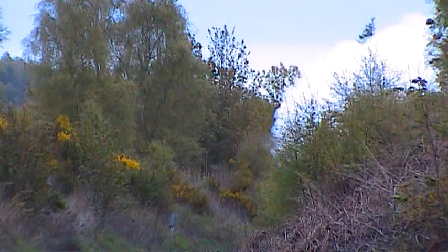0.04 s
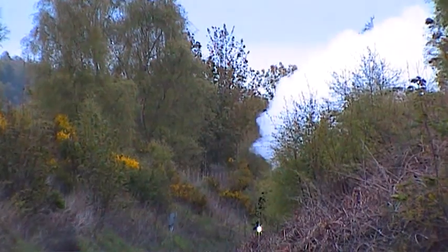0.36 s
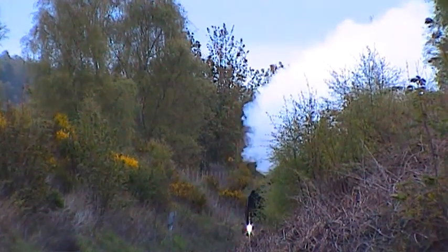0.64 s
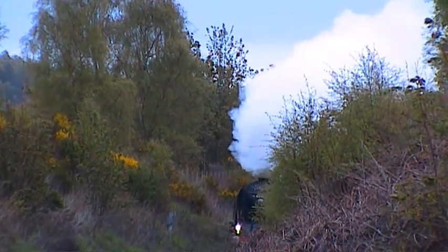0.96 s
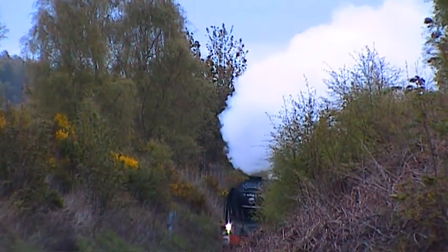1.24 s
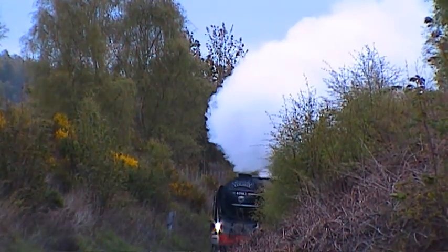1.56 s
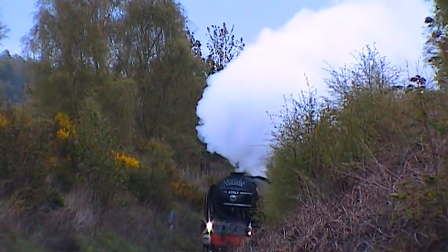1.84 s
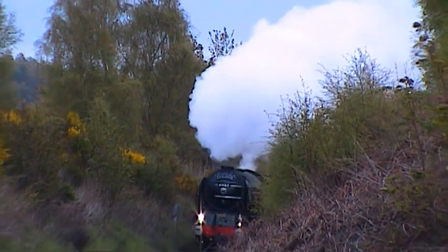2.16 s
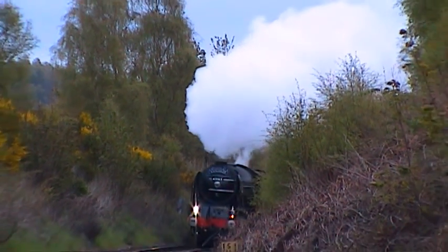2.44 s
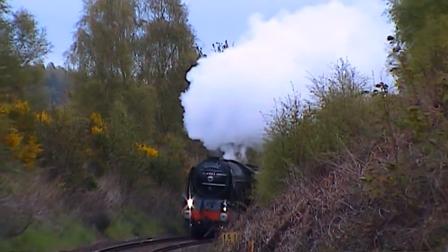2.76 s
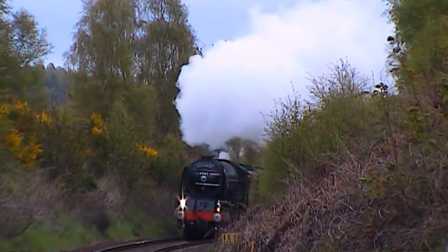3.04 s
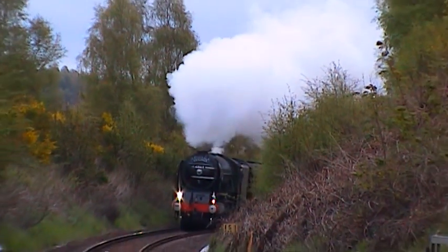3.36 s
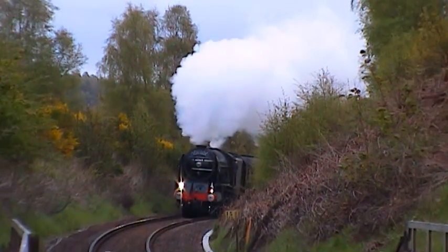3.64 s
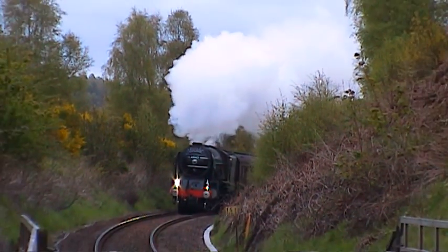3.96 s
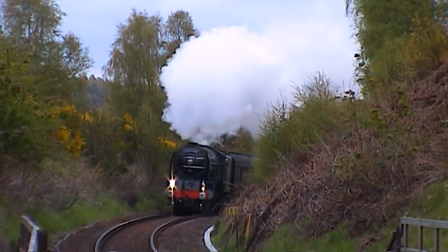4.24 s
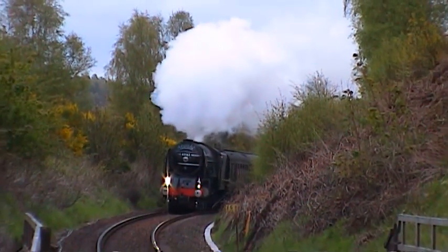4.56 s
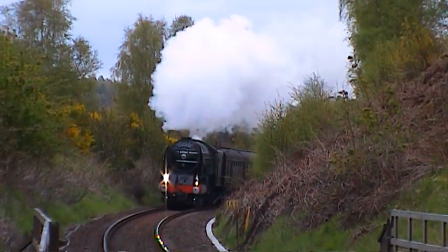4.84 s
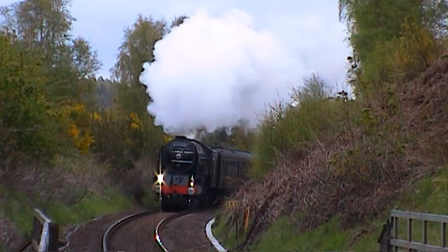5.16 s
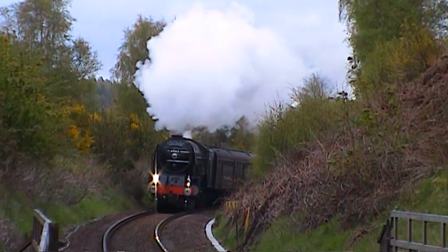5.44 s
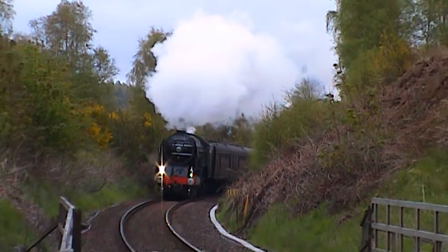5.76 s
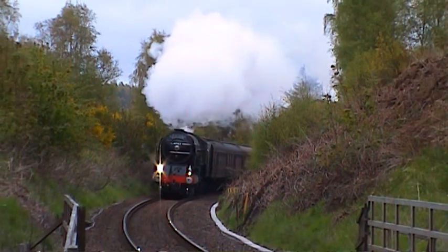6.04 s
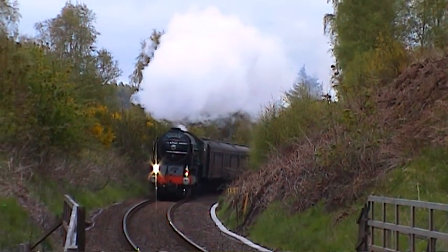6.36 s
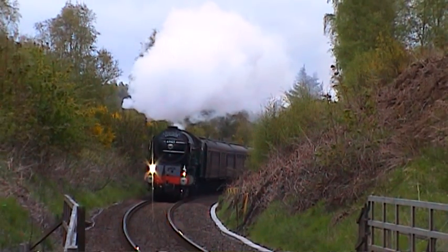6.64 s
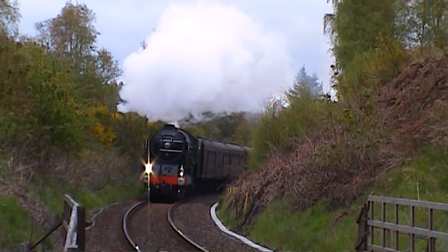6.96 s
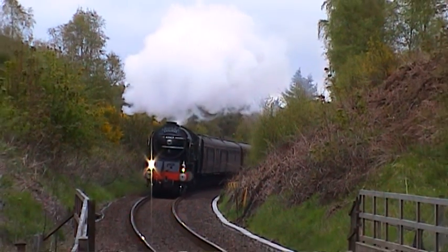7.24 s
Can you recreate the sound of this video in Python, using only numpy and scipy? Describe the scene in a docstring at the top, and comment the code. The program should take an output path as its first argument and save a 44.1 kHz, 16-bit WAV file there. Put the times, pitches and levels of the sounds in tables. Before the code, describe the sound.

A steam locomotive approaches outdoors with rapid, rasping chuffs, wheels rumbling on the rails and hissing steam growing louder.

```python
"""A steam locomotive approaching

A three-cylinder engine works hard towards the listener, round a curve in a wooded cutting.
Used steam roars up the chimney in six blasts to each turn of the driving wheels, about 17 a second.
The wheels rumble and briefly howl on the rails; the hiss of steam grows as the engine clears a bank."""
import sys
import numpy as np
from scipy import signal
from scipy.fft import rfft, irfft, next_fast_len
from scipy.io import wavfile

SR = 44100
rng = np.random.default_rng(int(sys.argv[2]) if len(sys.argv) > 2 else 0)


def store_wav(level_fs):
    """Save 16-bit WAV to argv[1]."""
    pcm = np.round(np.clip(np.atleast_2d(level_fs), -1, 1) * 32767)
    wavfile.write(sys.argv[1], SR, pcm.T.astype(np.int16))


N = 326781

TURN_S, WHEEL_RIM_M = .34814, 6.4  # one turn of the driving wheels: time taken, track covered


def from_db(db):
    """Turn decibels into a gain to multiply by."""
    return 10 ** (np.asarray(db) / 20)


def rms_one(x):
    """Scale a signal so that its average strength (rms) is 1."""
    return x / np.sqrt(np.mean(x ** 2) + 1e-20)


def in_time(rows):
    """Join rows that start with a time into curves, one for each further column."""
    s, *columns = np.transpose(rows)
    return [np.interp(np.arange(N) / SR, s, column) for column in columns]


def at_hz(points, hz):
    """Read between the points of a spectrum, giving each octave equal room."""
    point_hz, value = np.transpose(points)
    return np.interp(np.log(hz + 1e-3), np.log(point_hz), value)


def drift(rate_hz):
    """A random wobble of size about 1: noise at every 20th sample, smoothed twice."""
    keep = np.exp(-2 * np.pi * rate_hz * 20 / SR)
    noise = rng.standard_normal(N // 20 + 2002)
    slow = signal.lfilter([1], [1, -2 * keep, keep * keep], noise)[2000:]
    return np.interp(np.arange(N) / 20, np.arange(len(slow)), rms_one(slow))


def swells(rows):
    """Gain of sounds that build up to a peak and die away."""
    t = np.arange(N) / SR
    gains = [from_db(db) * np.exp(np.minimum((t - peak_s) / rise_s, (peak_s - t) / fall_s))
             for peak_s, db, rise_s, fall_s in rows]
    return np.sqrt(sum(gain ** 2 for gain in gains))


def distance_m(start_m=190):
    """How far off the engine is: each wheel turn brings it one rim length closer."""
    return start_m - WHEEL_RIM_M / TURN_S * np.arange(N) / SR


def nearness():
    """Average distance over present distance: 1 halfway through, then more."""
    metres = distance_m()
    return metres.mean() / metres


def throb(power, depth, flutter_db, flutter_hz):
    """A pulsing gain: blasts over a steady wash scattered by the trees, shaken by swirling air."""
    depth = np.clip(depth * nearness() ** 0.08, 0, 1)  # closer means less scatter, so a deeper beat
    beat = np.sqrt(1 - depth + depth * power / power.mean())
    eddies = 2 * np.tanh(drift(flutter_hz) / 2)
    return rms_one(beat * from_db(flutter_db * eddies))


# How wide the noise sounds, widest in the highest treble.
# Each row: frequency in Hz, side level over mid level in dB.
STEREO_WIDTH = [(60, -17), (110, -11), (200, -41), (500, -35), (1200, -18), (2400, -18), (4400, -13.5),
                (8100, -13), (9700, -7.5), (12000, 13.5)]


def turbulence(spectrum, resonances=()):
    """Stereo noise of strength 1, shaped by a spectrum and resonances; the treble spreads widest."""
    size = next_fast_len(N)
    hz = np.arange(size // 2 + 1) * SR / size
    db = at_hz(spectrum, hz)
    for centre_hz, width_hz, lift_db in resonances:
        db = db + lift_db / (1 + (2 * (hz - centre_hz) / width_hz) ** 2)
    mid, side = rfft(rng.standard_normal((2, size))) * from_db(db)
    side = side * from_db(at_hz(STEREO_WIDTH, hz))
    return rms_one(irfft(np.array([mid + side, mid - side]), size)[:, :N])


# The tone of the open air. Each row: frequency in Hz, relative level in dB.
AIR_SPECTRUM = [(20, -20), (40, -41), (58, 0.5), (82, -6), (130, 0.5), (200, 2), (500, -7), (3000, -21),
                (12000, -35.5)]


def outdoor_air():
    """A quiet, steady, low rush behind everything."""
    return from_db(-64.0) * turbulence(AIR_SPECTRUM)


# Three clicks: at the opening, soon after, and where the beat skips. Each row: start in seconds,
# snap and crackle levels in dB before filtering, crackle fade time in seconds, treble limit in Hz.
CLICKS = [(0.127, -51, -36.5, 0.0018, 6900), (1.168, -42, -25, 0.0016, 5600),
          (6.454, -24, -24, .0004, 6900)]


def clicks(snap_s):
    """Brief, sharp clicks: one spike and a thin crackle, gone in a few milliseconds."""
    out, age = np.zeros(N), np.arange(SR // 50) / SR
    cut_bass = signal.butter(1, 800, "high", fs=SR, output="sos")
    for s, snap_db, crackle_db, fade_s, top_hz in CLICKS:
        crackle = signal.sosfilt(cut_bass, rng.standard_normal(len(age)) * np.exp(-age / fade_s))
        click = from_db(crackle_db) * crackle - from_db(snap_db) * np.exp(-age / snap_s)
        cut_treble = signal.butter(2, top_hz, fs=SR, output="sos")
        at = round(s * SR)
        out[at:at + len(age)] += signal.sosfilt(cut_treble, click)
    return out


# The train's squeaks. Each row: peak in seconds, pitch in Hz, level in dB, half length in seconds.
HIGH_SQUEAKS = [(4.96, 13000, -68, .022), (5.32, 15200, -71, .035), (5.695, 15100, -63, .016)]


def squeaks(waver_hz):
    """Faint, very high squeaks, each a short swell of a wavering tone."""
    out, t = np.zeros(N), np.arange(-SR // 8, SR // 8) / SR
    smooth = signal.butter(2, waver_hz, fs=SR, output="sos")
    for s, hz, db, half_s in HIGH_SQUEAKS:
        waver = rms_one(signal.sosfilt(smooth, rng.standard_normal(len(t))))
        swell = from_db(db) * np.exp(-(t / half_s) ** 2)
        at = round((s + t[0]) * SR)
        out[at:at + len(t)] += swell * waver * np.sin(2 * np.pi * hz * t)
    return out


# The tones of the rumble, wheel drone and rail roar. Each row: frequency in Hz, relative level in dB.
RUMBLE_SPECTRUM = [(70, -56), (125, -24), (170, -9.5), (235, 0), (330, 1.5), (420, -3.5), (600, -31),
                   (1000, -43), (5000, -76)]
DRONE_SPECTRUM = [(150, -48), (300, -14), (390, 0), (460, 2), (560, -10), (750, -24), (1200, -43),
                  (5000, -75)]
RAIL_SPECTRUM = [(100, -44), (300, -25.5), (550, -1), (720, 1), (1150, -1.5), (1400, -2.5), (2500, -14),
                 (5000, -47), (11000, -80)]
# Where the wheels ring or dip. Each row: frequency in Hz, width in Hz, boost in dB.
WHEEL_RESONANCES = [(446, 64, 2), (557, 99, -3), (787, 62, 4), (929, 85, 3.5)]
# The rolling train. Each row: time in seconds, rumble and drone levels in dB before a small trim.
ROLLING_LEVELS = [(0.15, -63.5, -60.5), (1.5, -61.5, -51), (3.3, -55, -49), (4.1, -54.5, -54),
                  (5.26, -54.5, -51), (6.33, -52, -45), (6.95, -54, -49), (7.15, -52, -47)]
# The roar of wheels on rails. Each row: time in seconds, level in dB.
RAIL_LEVELS = [(.25, -37), (1.3, -37.5), (2.2, -39.5), (2.8, -36.5), (4.4, -38), (5.8, -39.5), (6.7, -35.5),
               (7.4, -36.5)]


def rolling_wheels(power):
    """Wheels rumble, drone and roar on the rails, surging with the piston strokes."""
    rail_db, = in_time(RAIL_LEVELS)
    rumble_db, drone_db = in_time(ROLLING_LEVELS)
    rumble = from_db(rumble_db + 1.0) * turbulence(RUMBLE_SPECTRUM)
    rumble *= throb(power, depth=0.1, flutter_db=0.3, flutter_hz=17)
    drone = from_db(drone_db - 1.5) * turbulence(DRONE_SPECTRUM)
    rail = from_db(rail_db) * turbulence(RAIL_SPECTRUM, WHEEL_RESONANCES)
    return rumble + (drone + rail) * throb(power, depth=0.14, flutter_db=0.54, flutter_hz=22)


# The wheels grab the rail. Each row: peak in seconds, level in dB, rise and fall times in seconds.
FLANGE_HOWLS = [(.48, -35.5, 0.049, 0.06), (.76, -34.5, 0.32, 0.32)]


def flange_howl():
    """The wheels' guiding lips (flanges) rub the outer rail and stir one broad, rough resonance."""
    spectrum = [(500, -35), (750, -13), (850, 5), (990, 7), (1130, -4), (1600, -26), (6000, -76)]
    return swells(FLANGE_HOWLS) * from_db(1.3 * drift(rate_hz=22)) * turbulence(spectrum)


def approach(level_db, growth, bank_db, half_clear_s=2.58, clearing_s=0.25):
    """Gain that grows as the engine nears; at first the bank blocks bank_db of it."""
    hidden = (1 - np.tanh((np.arange(N) / SR - half_clear_s) / (2 * clearing_s))) / 2
    return from_db(level_db - bank_db * hidden) * nearness() ** growth


# The tones of the hiss and the higher sizzle. Each row: frequency in Hz, relative level in dB.
HISS_SPECTRUM = [(2000, -36), (3500, 2.5), (4700, -2), (5250, 7.5), (6300, 3), (7400, -12), (8100, -6),
                 (9500, -10.5), (12000, -62)]
SIZZLE_SPECTRUM = [(5000, -36), (6500, -10), (8000, -2), (8700, 0), (9400, -3), (10000, -7.5), (11000, -18),
                   (12000, -29), (13000, -53), (16000, -57)]
# Where the steam seals (glands) ring. Each row: frequency in Hz, width in Hz, boost in dB.
GLAND_RESONANCES = [(4196, 780, 12.5), (8750, 90, 0.5)]
# The changing flow. Each row: time in seconds, boost for both sounds in dB, extra for the sizzle in dB.
FLOW_CHANGES = [(2.3, -1, 0.5), (3.3, 4.5, -8), (4.3, 3, 3), (4.9, -1.5, 3.5), (5.6, -3, -0.5),
                (6.9, -1.5, 3), (7.4, -4, -0.5)]


def steam_hiss(power):
    """Steam escapes from seals and chimney, pulsing with the blasts; its sizzle grows as it nears."""
    flow_db, extra_db = in_time(FLOW_CHANGES)
    hiss = turbulence(HISS_SPECTRUM, GLAND_RESONANCES)
    hiss *= approach(level_db=-48.5, growth=1.83, bank_db=7.5)
    hiss *= throb(power, depth=0.45, flutter_db=2.0, flutter_hz=60.7)
    sizzle = turbulence(SIZZLE_SPECTRUM, GLAND_RESONANCES)
    sizzle *= approach(level_db=-63.0, growth=2.85, bank_db=1.5)
    sizzle *= throb(power, depth=0.13, flutter_db=1.2, flutter_hz=40)
    return from_db(flow_db) * (hiss + from_db(extra_db) * sizzle)


# Spurts from a leak. Each row: peak in seconds, level in dB, rise and fall times in seconds.
SPURTS = [(2, -58.5, 0.98, 0.59), (5.25, -46, 0.48, 1.6)]


def steam_leak(power):
    """Steam sings out high through a narrow leak, with two slow spurts on top."""
    spectrum = [(5000, -33), (6200, -2), (6800, 1.5), (7350, 3), (7900, -4), (9300, -22), (12000, -67)]
    gain = np.hypot(approach(level_db=-54.0, growth=1.03, bank_db=17), swells(SPURTS))
    return gain * turbulence(spectrum) * throb(power, depth=0.23, flutter_db=1.5, flutter_hz=30)


# The six limping blasts of a wheel turn. Each row: place in the turn from 0 to 1, relative level in dB.
TURN_BEATS = [(0, 0.54), (0.148, -0.5), (0.332, 0.1), (0.484, 0.5), (.666, 0), (0.815, 0)]
# Blasts that bark out or fall short. Each row: rough time in seconds, extra level in dB.
BLAST_ACCENTS = [(0.19, 1.5), (0.37, 1), (0.54, 1), (0.66, -1.2), (1.0, 2.2), (1.07, 1.3), (1.19, -0.5),
                 (1.93, 3), (2.17, -1.5), (2.46, 0), (2.63, 1.5), (2.75, 0.5), (3.21, -2.5), (3.27, 2),
                 (3.33, 2.5), (3.56, -2.2), (3.68, 3), (3.74, -1.5), (3.85, 1.7), (3.91, -1.5), (4.02, 4),
                 (4.14, 1), (4.2, 1.7), (4.37, 2), (4.43, -0.5), (4.66, -0.5), (4.84, 1), (5.07, 4.5),
                 (5.3, -0.5), (5.41, 2.5), (5.53, 1), (5.76, 2), (5.83, -4), (5.88, -0.5), (5.94, 1),
                 (6.11, 3.2), (6.34, -2.5), (6.5, -3.2), (6.56, 2.5), (6.67, -2.8), (6.9, 2), (6.96, 2),
                 (7.08, -2), (7.14, 1.5), (7.31, 3.2)]


def blasts(lead_s, open_s, empty_s, spread_db, shorten_per_db, first_turn_s=.1406):
    """The exhaust's pulsing power, averaging 1: each valve opens smoothly, then its cylinder empties."""
    place, beat_db = np.transpose(TURN_BEATS)
    turn_starts = np.arange(first_turn_s, N / SR, TURN_S)
    times = (turn_starts[:, None] + TURN_S * place).ravel()
    times -= .023 * (times > 6.47)  # once, the beat skips slightly ahead
    level_db = np.resize(beat_db, len(times)) + spread_db * rng.standard_normal(len(times))
    for s, extra_db in BLAST_ACCENTS:
        level_db[np.argmin(np.abs(times - s))] += extra_db
    power = np.zeros(N + SR)
    for s, db in zip(times, level_db):
        stretch = np.exp(-shorten_per_db * db)  # a harder blast is over sooner
        age = np.arange(SR // 4) / SR / stretch
        opening = 1 - np.exp(-(age / open_s) ** 3)
        emptying = np.exp(-(age / empty_s) ** 2)
        at = max(int((s - lead_s * stretch) * SR), 0)
        power[at:at + len(age)] += from_db(db) ** 2 * opening * emptying
    return power[:N] / power[:N].mean()


# Where the chimney rings or dips. Each row: frequency in Hz, width in Hz, boost in dB.
CHIMNEY_RESONANCES = [(1069, 40, 1.5), (1153, 34, 4.5), (1277, 40, -0.5), (1554, 45, -1), (1700, 56, 7.5),
                      (1822, 42, 4), (2220, 210, 3), (2590, 110, -3.5), (2830, 86, 2.5), (3430, 50, -5.5),
                      (3550, 106, 4), (3780, 110, -1), (4130, 45, -1), (4243, 300, 7)]


def chimney(sound):
    """The chimney colours a sound and rings on after each burst; the overall level stays the same."""
    out = sound
    for hz, width_hz, lift_db in CHIMNEY_RESONANCES:
        damp, lift = np.pi * width_hz / SR, from_db(lift_db / 2)
        tuning = -2 * np.cos(2 * np.pi * hz / SR)
        out = signal.lfilter([1 + damp * lift, tuning, 1 - damp * lift],
                             [1 + damp / lift, tuning, 1 - damp / lift], out)
    return out * sound.std() / out.std()


# The tones of the roar, bright rasp and hollow bark. Each row: frequency in Hz, relative level in dB.
ROAR_SPECTRUM = [(150, -35), (400, -27), (700, -11.5), (1100, -2), (1500, -0.5), (2300, -2), (2700, -6),
                 (3400, -14), (5000, -56), (12000, -82)]
RASP_SPECTRUM = [(1800, -31.5), (2500, 5), (2900, 4), (3400, 1.5), (3850, -3.5), (4350, -9), (4700, -12),
                 (5400, -14.5), (8000, -47), (12000, -72)]
BARK_SPECTRUM = [(100, -56), (280, -20), (400, -4), (560, -24), (790, 0), (900, -16), (1090, 3), (1220, 3),
                 (1350, -16), (1800, -35), (6000, -75)]
# Exhaust levels before a small trim. Each row: time in seconds, roar in dB, rasp over the roar in dB.
EXHAUST_LEVELS = [(0.1, -42, -5), (1.1, -41, -1.5), (2.3, -37.5, -4), (3.6, -34, -3), (4.2, -32, -3.5),
                  (5.1, -30.5, -6.8), (6.2, -31.5, -13), (6.7, -33, -10), (7.4, -32.8, -4)]
# The bark swells as the engine faces the listener.
# Each row: peak in seconds, level in dB, rise and fall times in seconds.
BARK_SWELLS = [(6.85, -35.5, 0.96, 0.74)]


def exhaust(power):
    """Each blast roars and rasps through the chimney; close up, a hollow bark joins in."""
    roar_db, rasp_db = in_time(EXHAUST_LEVELS)
    roar = from_db(roar_db - 0.26) * turbulence(ROAR_SPECTRUM)
    roar *= throb(power, depth=0.6, flutter_db=1.3, flutter_hz=90)
    rasp = from_db(roar_db + rasp_db + 0.04) * turbulence(RASP_SPECTRUM)
    rasp *= throb(power ** 1.56, depth=0.57, flutter_db=1.7, flutter_hz=110)  # rises faster with flow
    bark = swells(BARK_SWELLS) * turbulence(BARK_SPECTRUM)
    bark *= throb(power, depth=0.93, flutter_db=2.5, flutter_hz=20)
    return chimney(roar + rasp + bark)


# The engine's direction. Each row: time in seconds, how much louder the left is than the right in dB.
ENGINE_DIRECTION = [(.7, 1.8), (1.7, 1.1), (4, .65), (7.4, .45)]


def scene():
    """The whole train, a little to the left and drawing towards the centre, over quiet outdoor air."""
    power = blasts(lead_s=0.03, open_s=0.036, empty_s=.026, spread_db=0.1, shorten_per_db=0.1)
    train = exhaust(power) + rolling_wheels(power) + flange_howl()
    train += steam_hiss(power) + steam_leak(power) + squeaks(waver_hz=350)
    pan_db, = in_time(ENGINE_DIRECTION)
    pan = from_db(np.array([pan_db, -pan_db]) / 2)
    return train * pan + outdoor_air() + clicks(snap_s=.00016)


# Two close microphone openings colour the sound unequally.
# Each row: frequency in Hz, left level over right in dB, how far the left wave leads in radians.
MIC_COLOUR = [(100, -.5, 0), (800, 0, -.2), (1900, 0, -.22), (2350, 1.1, -.4), (3000, -1.5, -.3),
              (3550, .6, -.3), (3820, -2, -.5), (4300, -.5, 0), (4850, 3, -.05), (5300, -1, -.35),
              (5700, 1, -.45), (6100, -3, 0), (6700, 1.4, .1), (8300, 1, -.05), (10000, -.5, 0)]


def record(dry, silent_s=.105, cutoff_hz=15700):
    """Left and right get their own colour; the sound opens abruptly, and the highest treble is cut."""
    size, colour = next_fast_len(N + SR // 10), np.array(MIC_COLOUR)
    hz = np.arange(size // 2 + 1) * SR / size
    left_db, left_lead = at_hz(colour[:, [0, 1]], hz), at_hz(colour[:, [0, 2]], hz)
    left = from_db(left_db / 2) * np.exp(1j * left_lead / 2)  # half here, the opposite on the right
    heard = irfft(rfft(dry, size) * np.array([left, 1 / left]), size)[:, :N]
    fade_in = np.clip((np.arange(N) / SR - silent_s) / .002, 0, 1)
    cut_treble = signal.ellip(10, .1, 80, cutoff_hz, fs=SR, output="sos")
    return signal.sosfilt(cut_treble, heard * fade_in)


dry = scene()
out = record(dry)
store_wav(out)
```